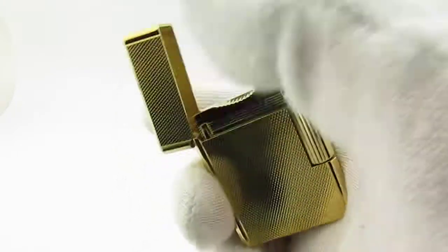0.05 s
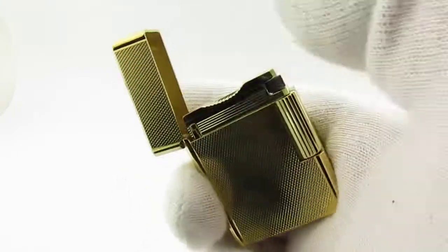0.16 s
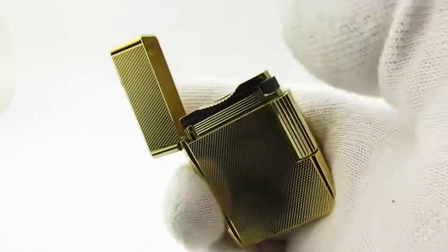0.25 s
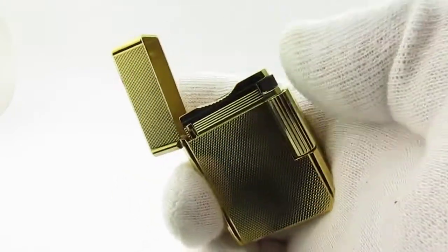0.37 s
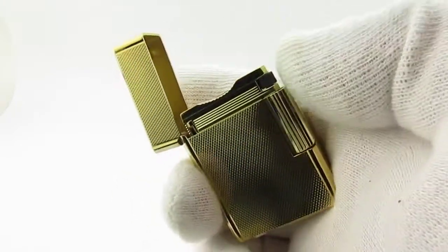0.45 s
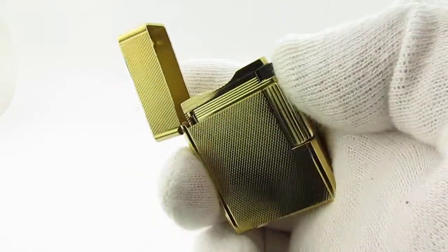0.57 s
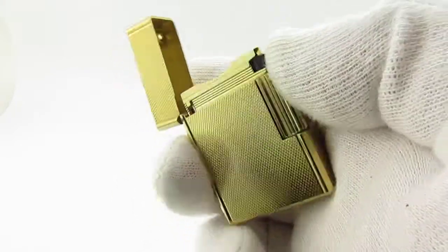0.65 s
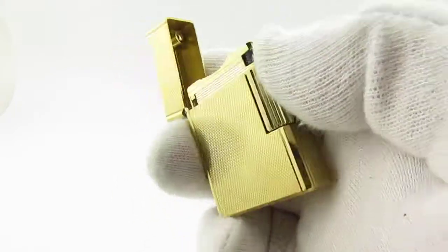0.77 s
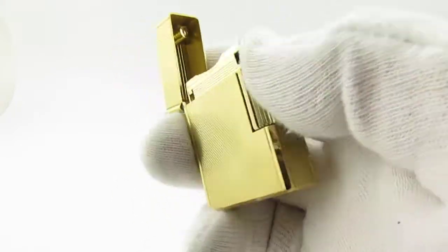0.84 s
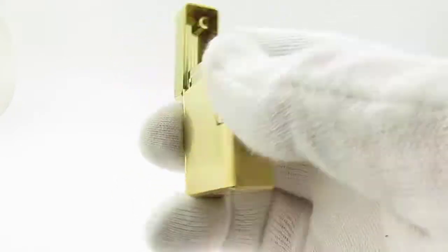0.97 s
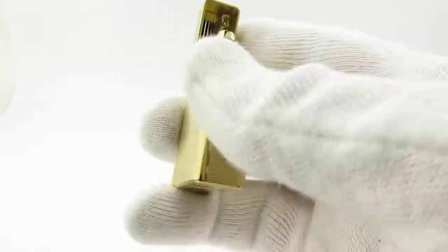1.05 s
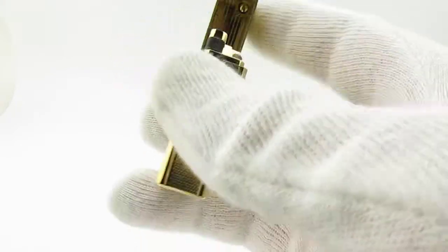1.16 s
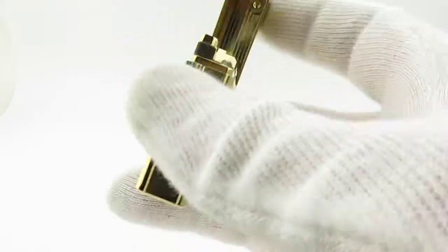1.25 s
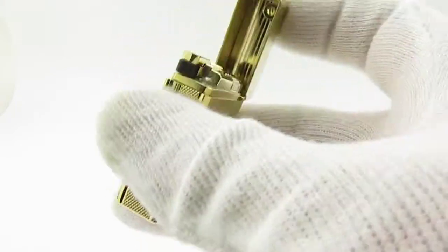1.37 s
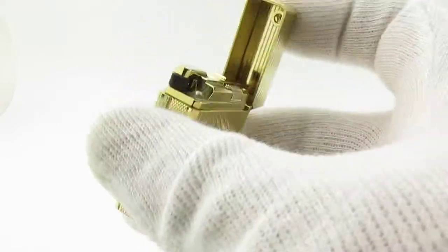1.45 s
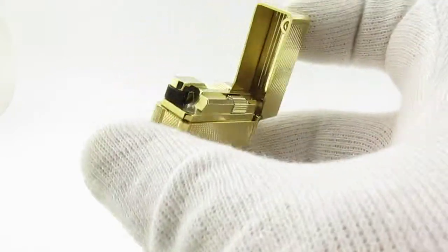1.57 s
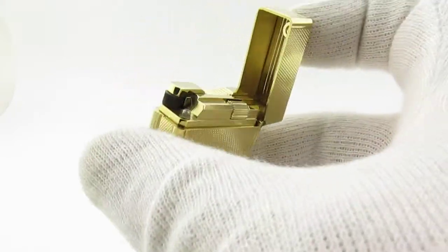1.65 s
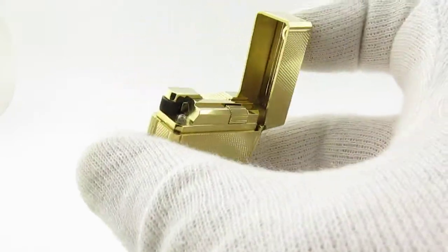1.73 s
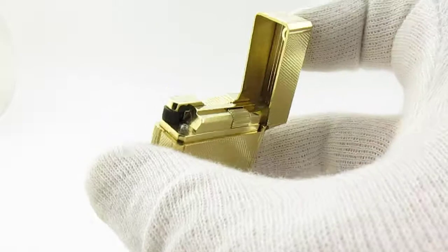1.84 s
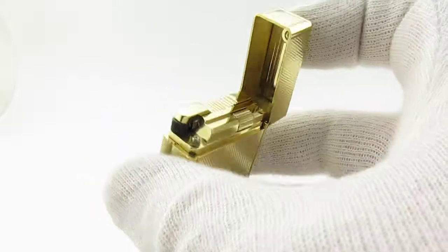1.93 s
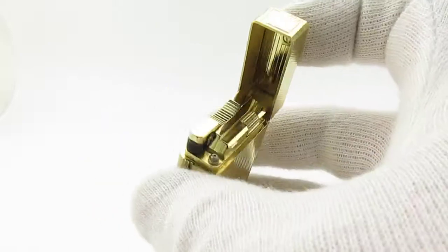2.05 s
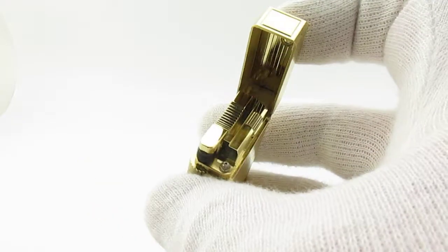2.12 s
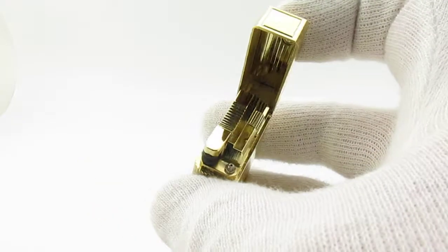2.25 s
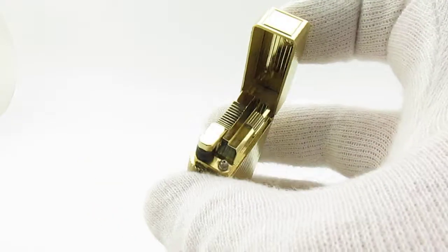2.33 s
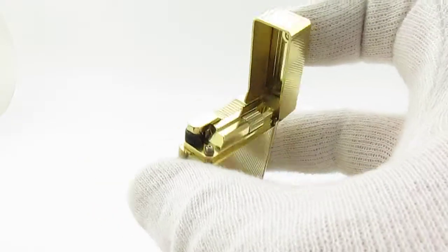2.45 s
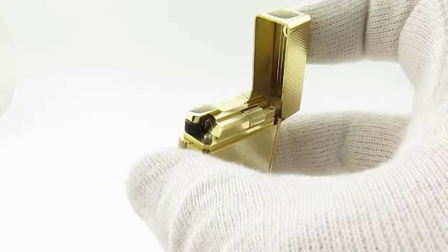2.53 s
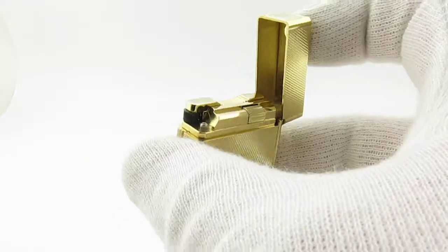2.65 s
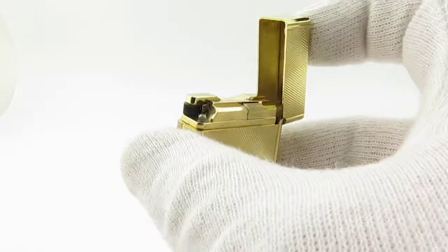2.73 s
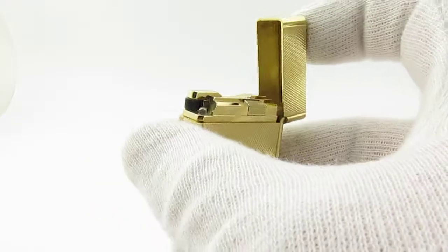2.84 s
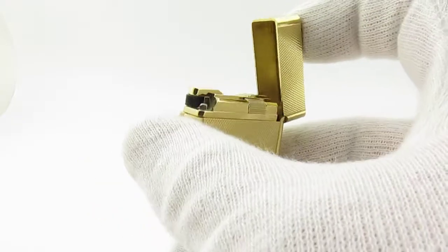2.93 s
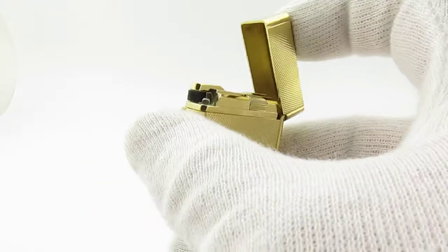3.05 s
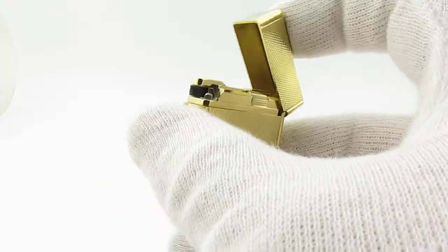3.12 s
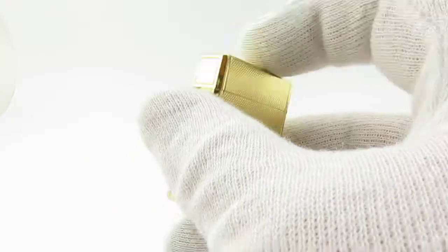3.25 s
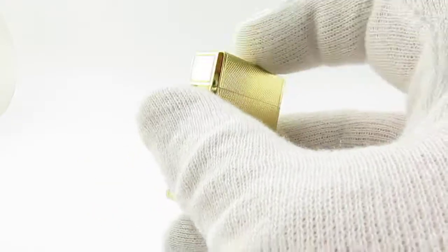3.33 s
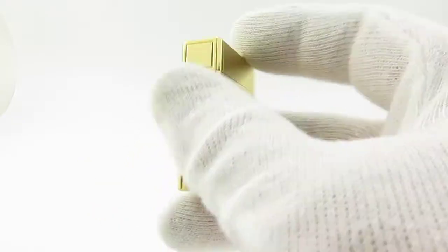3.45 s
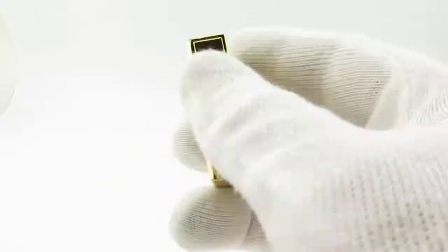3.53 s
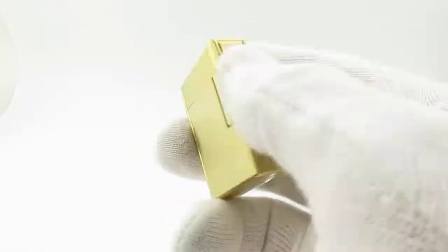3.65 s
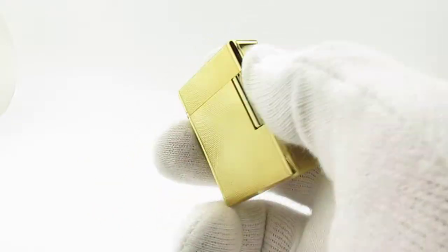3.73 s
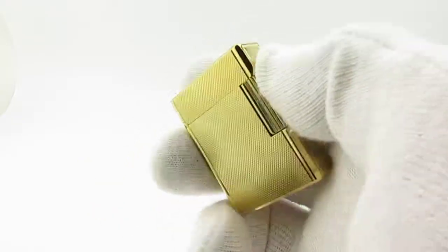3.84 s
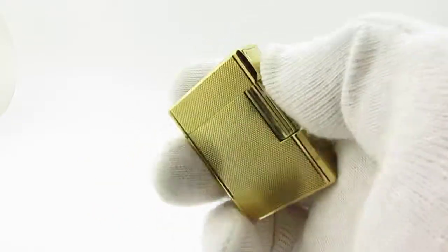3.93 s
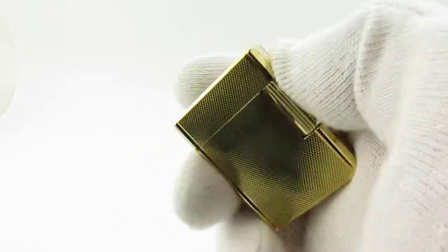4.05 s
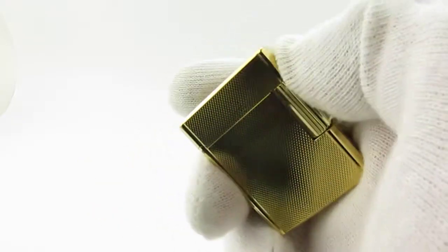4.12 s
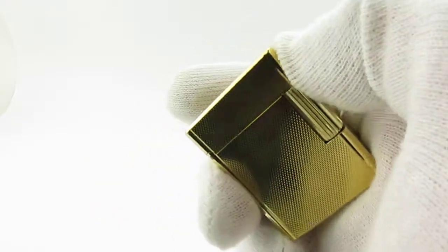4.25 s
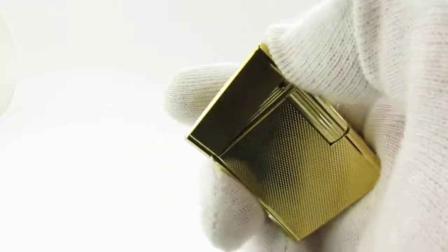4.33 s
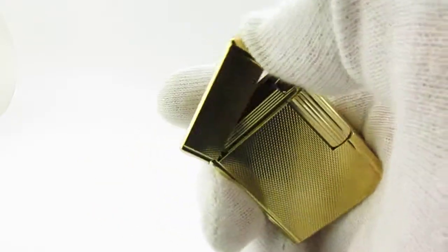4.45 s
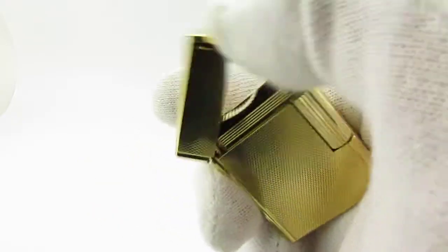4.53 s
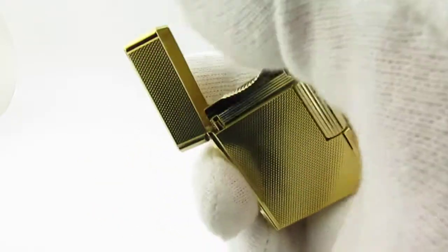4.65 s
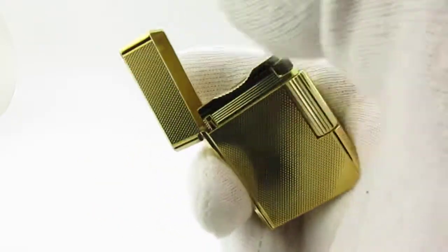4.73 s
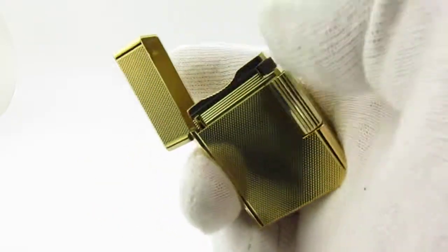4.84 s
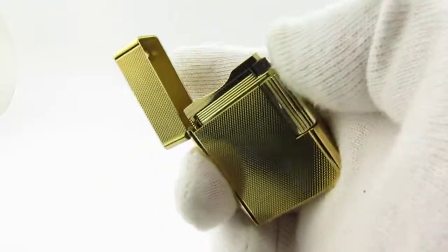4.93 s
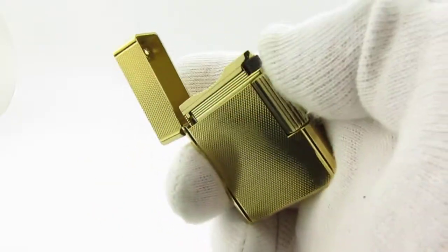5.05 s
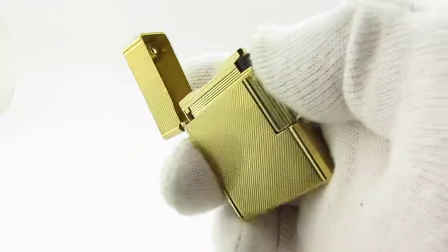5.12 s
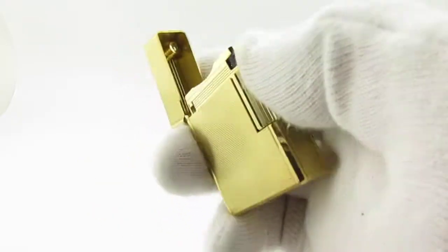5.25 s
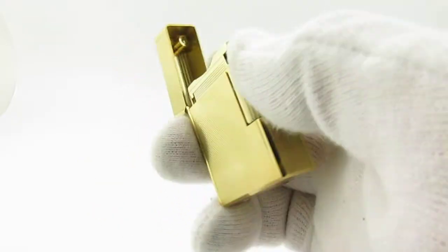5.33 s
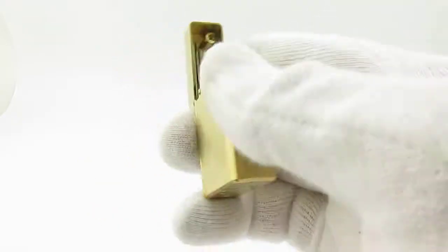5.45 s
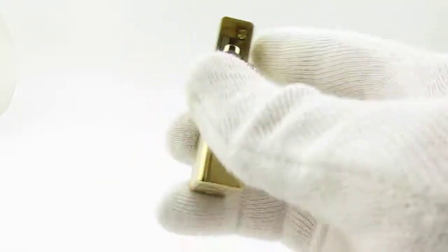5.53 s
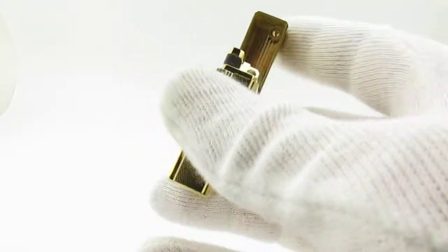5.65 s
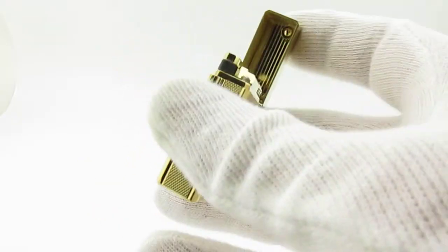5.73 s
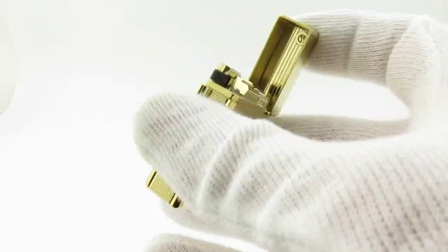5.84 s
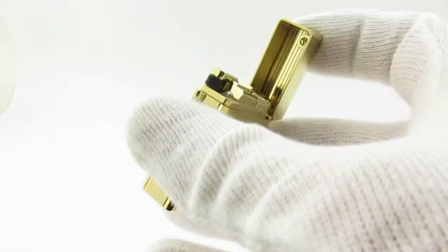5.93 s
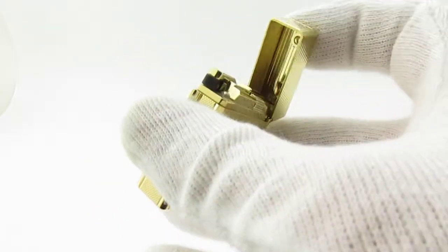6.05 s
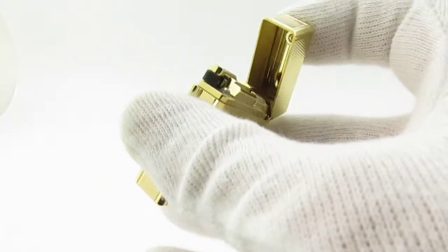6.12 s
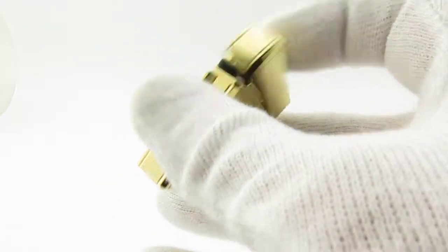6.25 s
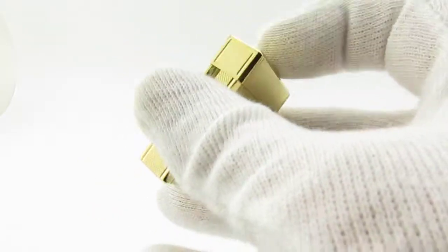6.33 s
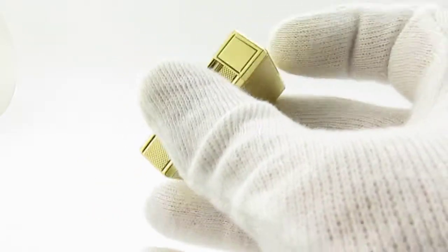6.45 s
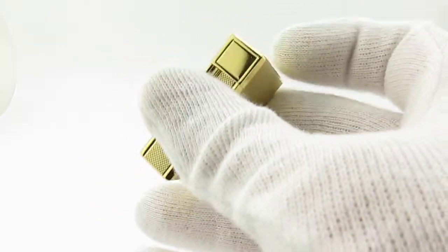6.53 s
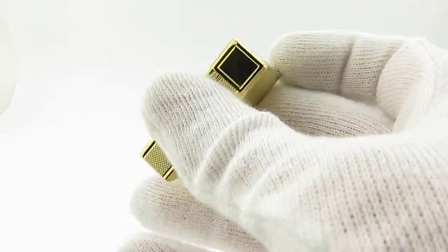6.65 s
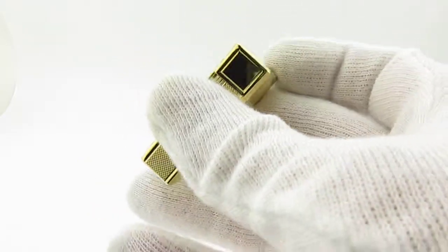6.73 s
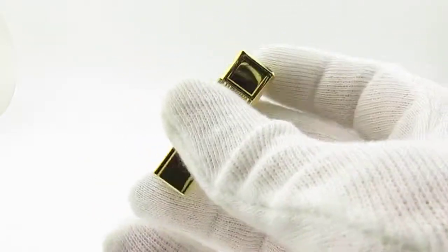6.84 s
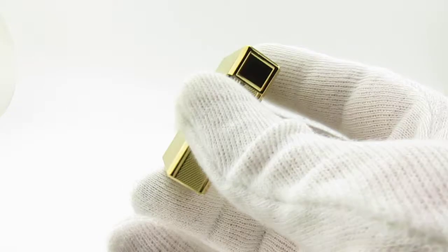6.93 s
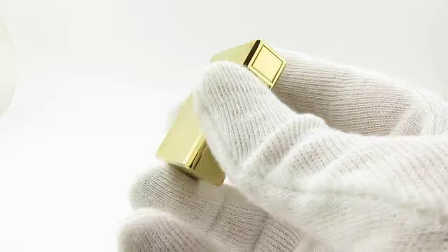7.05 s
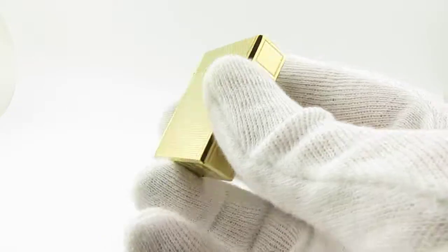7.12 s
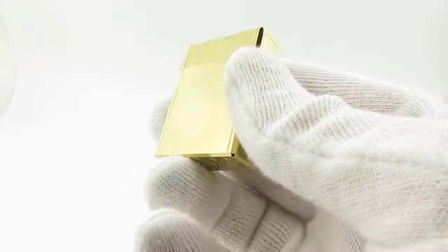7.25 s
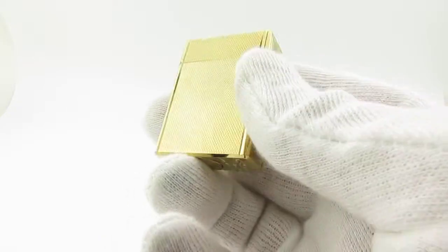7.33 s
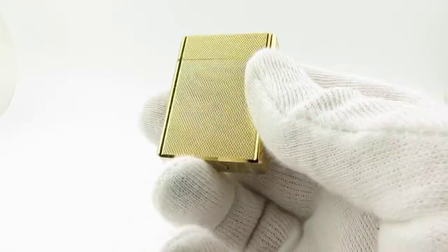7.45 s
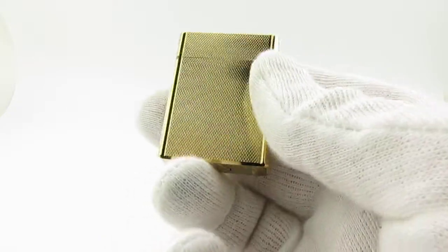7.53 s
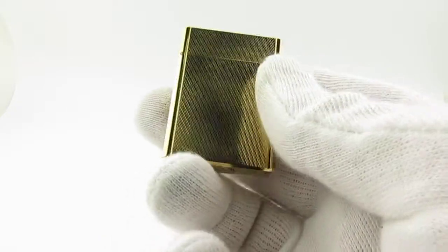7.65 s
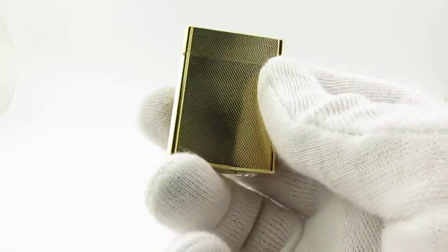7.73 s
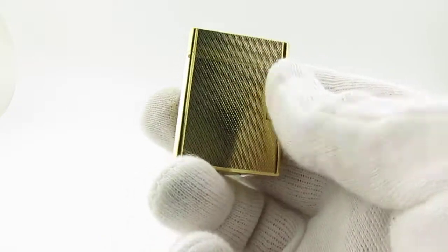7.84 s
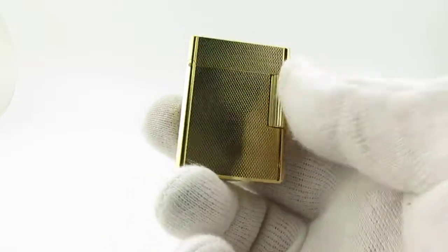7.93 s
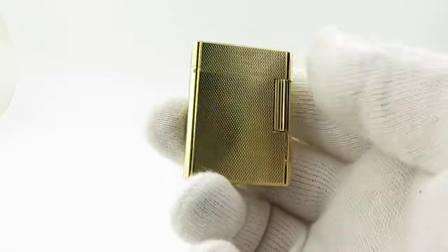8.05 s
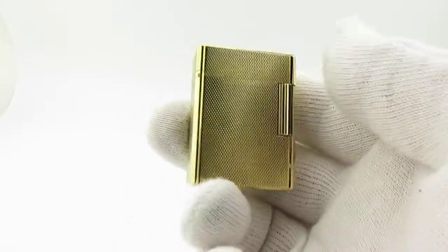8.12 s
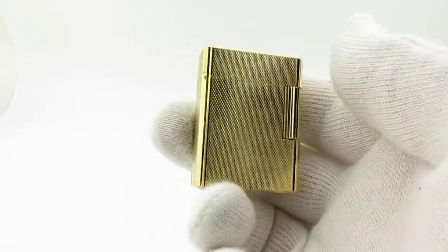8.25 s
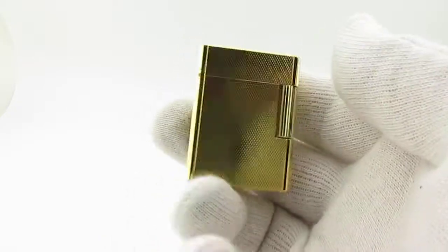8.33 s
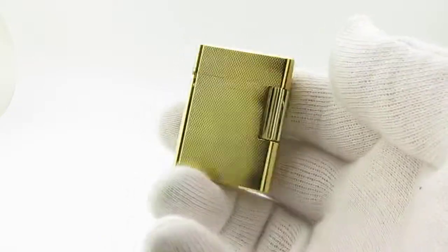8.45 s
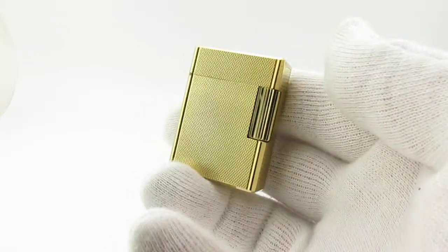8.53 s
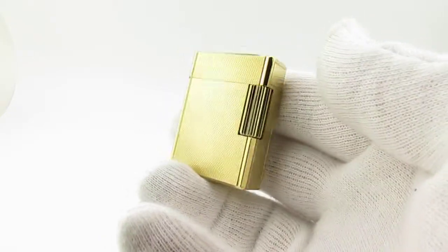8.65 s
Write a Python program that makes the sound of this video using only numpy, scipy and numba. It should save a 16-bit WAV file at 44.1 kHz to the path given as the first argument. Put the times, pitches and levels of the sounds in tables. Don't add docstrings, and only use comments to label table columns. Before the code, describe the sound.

A light hinged metal lid flicks open with a bright rattling clink, stays open over a barely audible gas seep, then snaps shut with a hard, overloaded crack and brief high ringing. It opens again and shuts sooner. Gloved fingers rustle faintly on ribbed metal; a small quiet room adds diffuse echo, low hum and distant vehicle rumble. The microphone is very close.

```python
import sys
import numpy as np
from scipy import signal
from scipy.fft import rfft, irfft, next_fast_len
from scipy.io import wavfile
from scipy.ndimage import uniform_filter1d
from numba import njit

SR = 44100
rng = np.random.default_rng(int(sys.argv[2]) if len(sys.argv) > 2 else 0)


def wrap_up_sound(samples):
    columns = np.atleast_2d(samples).T
    tamed = np.clip(columns, -1, 1)
    steps = np.round(tamed * 32767).astype(np.int16)
    wavfile.write(sys.argv[1], SR, steps)


def boost_factor(decibels):
    exponent = np.asarray(decibels, float) / 20
    return 10 ** exponent


N = 382562
TIME = np.arange(N) / SR

# start_s [s], blow_db [dB], ping_db [dB], ping_build_s [s]
OPENS = [
    (.0007, -4.5, -23, .012),
    (4.5478, -4.5, -20, .006),
]
# start_s [s], blow_db [dB], ping_db [dB], ping_build_s [s], thud_size [signed gain]
SHUTS = [
    (3.2442, 12, -12, .0005, .13),
    (6.2583, 12, -11, .0005, -.06),
]
# after_s [s], level_db [dB]
OPEN_BOUNCES = [
    (0, -4),
    (.0012, 2),
    (.0040, -3),
    (.0068, -9),
    (.0130, -10),
    (.0150, -9),
    (.0168, -6.5),
]
SHUT_BOUNCES = [
    (0, -2),
    (.0007, -3),
    (.0033, -6),
    (.0058, -6.5),
    (.0095, -13),
]
# pitch_hz [Hz], and level_db [dB], t60_s [s]
OPEN_MODES = np.column_stack([[3095, 3811, 3964, 4144, 5103, 5949, 7262, 8546, 8759, 9866, 10233, 10686,
                               12050, 13070], [(-3.5, 0.019), (-7.5, .05), (-7, 0.036), (-9, 0.035),
                                                (-2.5, .02), (-4, .03), (-9.5, 0.016), (-4.5, .03),
                                                (-3, 0.039), (-0.5, .02), (0, .025), (4, .025), (-7.5, .02),
                                                (-0.5, 0.036)]])
SHUT_MODES = np.column_stack([[2000, 2950, 6121, 8157, 8400, 8600, 9750, 10615, 11040, 11337, 12056, 12535,
                               13049, 13500, 14442, 14775], [(-10.5, 0.042), (-16.5, .015), (-7, .018), (-5.5, 0.016),
                                                (-7, 0.046), (-6, .05), (-7.5, .04), (-2, .04), (-8, 0.025),
                                                (-6, .04), (-4.5, .04), (-3.5, .03), (-5.5, .035),
                                                (-6, 0.055), (-3, .04), (-0.5, 0.058)]])
# pitch_hz [Hz], level_db [dB], t60_s [s]
OPEN_PING_MODES = [(4581, 0, .23), (4583.1, -29, .55), (4737, -16, .1)]
SHUT_PING_MODES = [(4549, 0, .07), (4512, -28, .4), (4536, -29, .5), (4572, -27, .55), (4607, -28, .45),
                   (4644, -28, .5), (8430, -22, .35), (8590, -21, .3), (1940, -35, .2), (2070, -36, .2)]
# pitch_hz [Hz], level_db [dB per Hz]
OPEN_RATTLE = [(180, -57.5), (300, -25), (564, -28), (2640, -8.5), (2920, -9.5), (3620, -10.5),
               (4640, -5.5), (6800, -15.5), (10500, -10), (15900, -23.5)]
SHUT_RATTLE = [(88, -52), (150, -32), (2200, -16), (3670, -17), (4640, -6.5), (7270, -7.5), (8330, -5.5),
               (13800, -8.5), (14700, 3), (15900, -12.5)]
# pitch_hz [Hz], left_minus_right_db [dB]
OPEN_SIDEWAYS = [(60, -0.5), (110, -1.5), (200, -5.0), (380, -4.0), (700, -2.5), (1290, -1.0), (2380, 7.5),
                 (4400, 4.5), (8120, -4), (15000, 6.5)]
SHUT_SIDEWAYS = [(60, 1.5), (110, 1.5), (200, 1.0), (380, 0.0), (700, 0.0), (1290, -1.5), (2380, 3),
                 (4400, 4), (8120, 3.5), (15000, -0.5)]
# size [signed gain], rise_s [s], swing_hz [Hz], settle_s [s]
SHUT_PUFF = (1.15, .000055, 3100, .00045)
# pitch_hz [Hz], width_hz [Hz], level_db [dB]
NOZZLE = [
    (10700, 600, 2),
    (12800, 780, 0.5),
]
# centre_s [s], half_length_s [s],
# level_db [dB], pitch_hz [Hz]
RUBS = [(.706, .11, -64, 9600), (.811, .073, -63, 5350), (.93, .14, -63, 9860), (2.953, .12, -73.5, 3000),
        (4.058, .09, -57.5, 7070), (4.292, .27, -63.5, 9500), (4.44, .035, -62, 3480),
        (4.504, .043, -59, 9850), (4.58, .07, -48, 140), (5.21, .09, -65, 6050), (5.36, .12, -62, 9200),
        (5.522, .07, -63, 8950), (6.789, .028, -60.5, 10760), (7.211, .21, -71, 8080),
        (7.62, .043, -75, 10040), (7.943, .12, -69, 8830), (8.605, .064, -75.5, 9000)]
# start_s [s], level_db [dB], pitch_hz [Hz], width_hz [Hz]
TICKS = [
    (3.735, -44, 1970, 1800),
    (3.7365, -38.5, 7000, 3000),
    (7.56, -50, 10170, 4000),
    (8.321, -38, 1150, 300),
    (8.421, -39, 1100, 300),
]
# pitch_hz [Hz], level_db [dB per Hz]
AIR_MID = [(12, -35.5), (20, -5), (42, -1.5), (149, -5.5), (214, -8.5), (316, -9.5), (354, -11.5),
           (672, -18), (939, -19), (1080, -17.5), (1280, -20), (2050, -24), (7600, -30), (10000, -25),
           (15700, -36)]
AIR_SIDE = [(12, -32.5), (20, -1.5), (65, 2), (162, -2), (418, -12), (481, -10.5), (672, -19), (1170, -19),
            (1310, -22.5), (2710, -26), (5150, -31.5), (10300, -29.5), (15700, -31)]
# centre_s [s], half_length_s [s], level_db [dB]
VEHICLES = [
    (1.3, 1.1, -60),
    (4.88, .2, -52),
    (6.0, .4, -67),
    (8.7, .6, -63),
]
# pitch_hz [Hz], width_hz [Hz], level_db [dB]
DRONES = [
    (714, 6, -84.5),
    (738, 6, -82.5),
]
# pitch_hz [Hz], width_hz [Hz], centre_s [s], half_length_s [s], level_db [dB]
PASSING = (294, 3, 6, 0.34, -66)
# pitch_hz [Hz], level_db [dB]
WHINE = [
    (15734, -89),
    (1209, -86),
]

LATCH_LEAD_S, LATCH_DB = .0088, -11


def colour(x, table):
    hz, db = np.transpose(table)
    size = next_fast_len(x.shape[-1] + 1, True) // 2 * 2
    f = np.maximum(np.arange(size // 2 + 1) * SR / size, 1)
    gain = boost_factor(np.interp(np.log(f), np.log(hz), db))
    return irfft(rfft(x, size) * gain, size)[..., :x.shape[-1]]


def band(x, hz, width_hz):
    return signal.lfilter(*signal.iirpeak(hz, hz / width_hz, fs=SR), x)


def filtered(x, order, hz, kind="low"):
    return signal.sosfilt(signal.butter(order, hz, kind, fs=SR, output="sos"), x)


def unit(x):
    return x / np.sqrt(np.mean(x ** 2))


def add(out, sound, s):
    i = int(round(s * SR))
    sound = sound[:, max(-i, 0):N - i]
    out[:, max(i, 0):max(i, 0) + sound.shape[1]] += sound


def ring(modes, sideways, longest_s, size):
    hz, db, t60 = np.transpose(modes)[:, :, None]
    t = np.arange(size) / SR
    lean_hz, lean_db = np.transpose(sideways)
    pan_db = np.interp(np.log(hz), np.log(lean_hz), lean_db)
    lead = np.clip(hz / 9000, 0, 2) * rng.standard_normal((len(modes), 1))
    fade = boost_factor(db - 60 * t / np.minimum(t60, longest_s))

    def port(side):
        tone = np.sin(2 * np.pi * hz * t + side * lead)
        return np.sum(fade * boost_factor(side * pan_db / 2) * tone, axis=0)
    return np.array([port(1), port(-1)])


def lid(events, bounces, first_t60_s, longer_per_s, modes, rattle, sideways, alike):
    out, t = np.zeros((2, N)), np.arange(4096) / SR
    for start_s, event_db, *_ in events:
        for after_s, db in bounces:
            blow_db = event_db + db
            rattle_t60_s = first_t60_s + longer_per_s * abs(after_s)
            shared, left, right = unit(colour(rng.standard_normal((3, 4096)), rattle))
            shake = alike * shared + np.sqrt(1 - alike ** 2) * np.array([left, right])
            shake = shake * boost_factor(-60 * t / rattle_t60_s)
            tones = ring(modes, sideways, longest_s=.033, size=4096)
            add(out, boost_factor(blow_db - 7) * shake + boost_factor(blow_db - 17) * tones, start_s + after_s)
    return out


def pings(events, lag_s, modes, sideways):
    out, t = np.zeros((2, N)), np.arange(24576) / SR
    for s, _, db, build_s, *_ in events:
        note = ring(modes, sideways, longest_s=1, size=24576)
        add(out, boost_factor(db) * note * (1 - np.exp(-t / build_s)), s + lag_s)
    return out


def puffs(events, size, rise_s, hz, settle_s):
    out, t = np.zeros((2, N)), np.arange(-64, 1024) / SR
    climb = np.exp(np.minimum(t, 0) / rise_s)
    for s, thud_size in events:
        thud = thud_size * np.cos(2 * np.pi * 620 * t) * np.exp(-t / .0015)
        swing = np.cos(2 * np.pi * hz * t) * np.exp(-t / settle_s) + thud
        shape = np.where(t < 0, climb, swing)
        add(out, size * np.array([.85 * np.roll(shape, 1), shape]), s - 64 / SR)
    return out


def opening_lid():
    contacts = [(-LATCH_LEAD_S, LATCH_DB)] + OPEN_BOUNCES
    clatter = lid(OPENS, contacts, .012, 1.8, OPEN_MODES, OPEN_RATTLE, OPEN_SIDEWAYS, alike=.35)
    bright = filtered(clatter, 10, 2750, "high")
    dull = filtered(clatter, 1, 900)
    return bright + boost_factor(-3) * dull + pings(OPENS, .0012, OPEN_PING_MODES, OPEN_SIDEWAYS)


def closing_lid():
    clatter = lid(SHUTS, SHUT_BOUNCES, .004, 3.5, SHUT_MODES, SHUT_RATTLE, SHUT_SIDEWAYS, alike=.65)
    pushed = puffs([(row[0] - .00007, row[-1]) for row in SHUTS], *SHUT_PUFF)
    catches = [(row[0] - LATCH_LEAD_S - .0003, .02) for row in OPENS]
    pulled = puffs(catches, size=-.4, rise_s=.000097, hz=2200, settle_s=.00025)
    body = filtered(clatter + pushed + pulled, 2, 280, "high")
    return body + pings(SHUTS, .0003, SHUT_PING_MODES, SHUT_SIDEWAYS)


def gloves():
    out, t = np.zeros((2, N)), np.arange(-11025, 11025) / SR
    for s, half_s, db, hz in RUBS:
        grains = rng.standard_normal((3, len(t))) * boost_factor(3.0 * rng.standard_normal(len(t)))
        width_hz = .8 * hz * np.clip(abs(np.log(hz / 3200)), .3, 1)
        grains = unit(band(0.98 * grains[0] + grains[1:], hz, width_hz))
        add(out, boost_factor(db) * grains * np.exp(-(t / half_s) ** 2), s - 11025 / SR)
    for s, db, hz, width_hz in TICKS:
        knock = rng.standard_normal(512) * np.exp(-np.arange(512) / SR / .002)
        knock = band(band(knock, hz, width_hz), hz, 2 * width_hz)
        add(out, boost_factor(db) * knock * np.ones((2, 1)), s)
    return out


def gas():
    lag_s, rise_s = .45, .3
    jet = rng.standard_normal((3, N))
    jet = 0.73 * jet[0] + 0.66 * jet[1:]
    flow = np.zeros(N)
    for up, down in zip(OPENS, SHUTS):
        flow += np.clip((TIME - up[0] - lag_s) / rise_s, 0, 1) * (TIME < down[0])
    hiss = sum(boost_factor(db) * band(band(jet, hz, w), hz, w) for hz, w, db in NOZZLE)
    return boost_factor(-73.5) * flow * unit(hiss)


def room(x, wet_db=-12.5, split_hz=4000, thin_hz=1200, warm_db=4):
    t = np.arange(SR) / SR
    low_t60_s, high_t60_s = .52, .43
    noise = rng.standard_normal((2, SR))
    low = filtered(noise, 2, split_hz)
    tail = low * boost_factor(warm_db - 60 * t / low_t60_s) + (noise - low) * boost_factor(-60 * t / high_t60_s)
    tail = tail * np.clip(t / .015, 0, 1) / np.sqrt(np.sum(tail[0] ** 2))
    thin = filtered(x, 2, thin_hz, "high")
    return boost_factor(wet_db) * signal.oaconvolve(thin, tail, axes=1)[:, :N]


def walk(rate_hz):
    k = int(SR / rate_hz)
    steps = np.repeat(rng.standard_normal(N // k + 1), k)
    return uniform_filter1d(uniform_filter1d(steps, k), k)[:N]


def drone(hz, width_hz):
    return unit(band(rng.standard_normal(N), hz, width_hz))


def swell(s, half_s):
    return np.exp(-((TIME - s) / half_s) ** 2)


def traffic():
    level = boost_factor(-68) + sum(boost_factor(db) * swell(s, half_s) for s, half_s, db in VEHICLES)
    return level * boost_factor(1.2 * walk(3.2)) * unit(band(band(rng.standard_normal(N), 45, 22), 45, 22))


def motors():
    peak_s, period_s = 2.4, 5.1
    hum_db = -68 + 4 * np.cos(2 * np.pi * (TIME - peak_s) / period_s)
    hum = boost_factor(hum_db) * drone(213, 15)
    for hz, width_hz, db in DRONES:
        hum = hum + boost_factor(db) * drone(hz, width_hz)
    hz, width_hz, s, half_s, db = PASSING
    return hum + boost_factor(db) * drone(hz, width_hz) * swell(s, half_s)


def air():
    mid, side = rng.standard_normal((2, N)) * boost_factor(0.27 * walk(5))
    mid = boost_factor(-58.5) * unit(colour(mid, AIR_MID))
    side = boost_factor(-55) * unit(colour(side, AIR_SIDE))
    whine = [boost_factor(db) * np.sin(2 * np.pi * hz * TIME) for hz, db in WHINE]
    return mid + whine[0] + (side + whine[1]) * np.array([[1], [-1]])


def scene():
    opening, closing = opening_lid(), closing_lid()
    echo = room(boost_factor(-5.5) * opening + closing)
    return opening + closing + echo + gloves() + gas() + traffic() + motors() + air()


@njit
def follow(x, attack, release):
    y, e = np.empty(len(x)), 0.
    for i in range(len(x)):
        e += (x[i] - e) * (attack if x[i] > e else release)
        y[i] = e
    return y


def band_limit(x):
    return signal.sosfilt(signal.butter(12, 16010, fs=SR, output="sos"), x)


def record(dry, attack_s=0.0016, release_s=.9, knee_db=-10, slope=1.723, sharp=3.0, settle_s=0.0014):
    heard = follow(np.abs(dry).max(axis=0), 1 / (attack_s * SR), 1 / (release_s * SR))
    gain = (1 + (heard / boost_factor(knee_db)) ** sharp) ** (-slope / sharp)
    glide = 1 / (settle_s * SR)
    gain = signal.lfilter([glide], [1, glide - 1], gain - 1) + 1
    notched = signal.lfilter(*signal.iirnotch(7870, 45, fs=SR), dry * gain)
    mix = np.clip(filtered(notched, 2, 30, "high"), -1, 1)
    return band_limit(mix)


dry = scene()
out = record(dry)
wrap_up_sound(out)
```